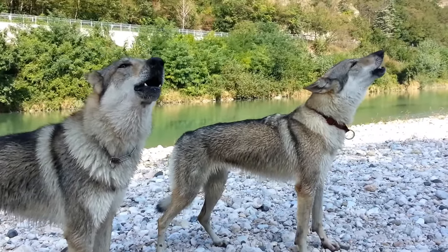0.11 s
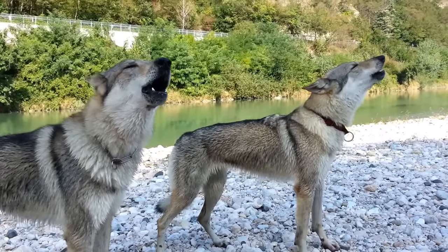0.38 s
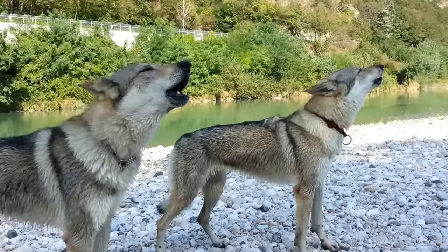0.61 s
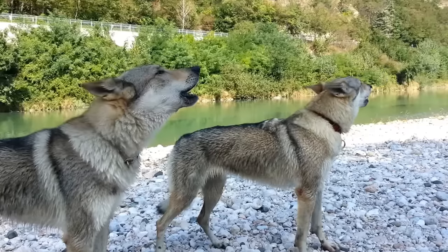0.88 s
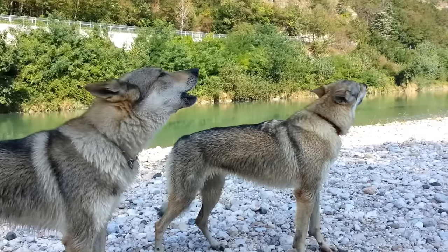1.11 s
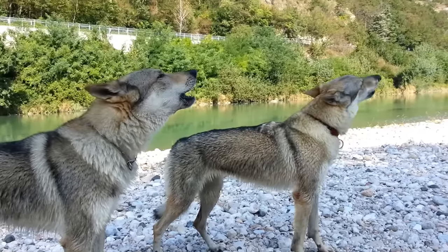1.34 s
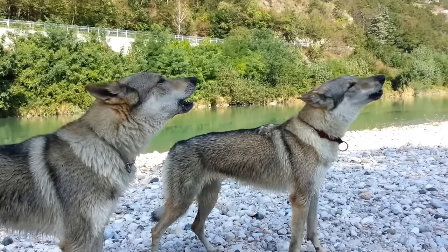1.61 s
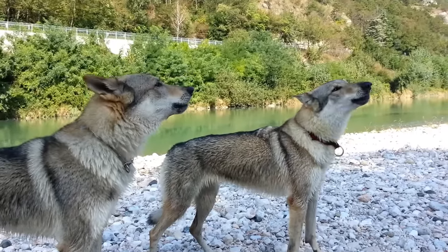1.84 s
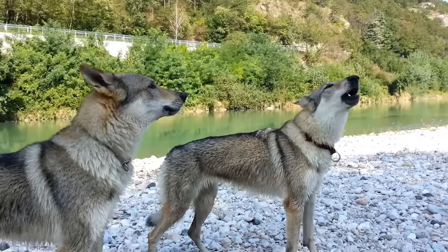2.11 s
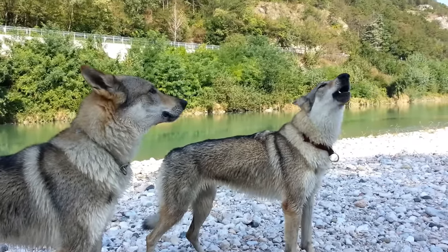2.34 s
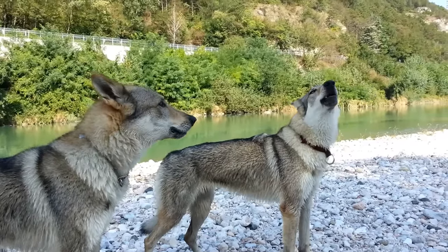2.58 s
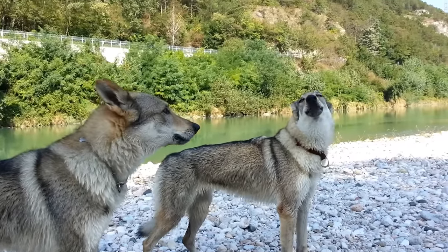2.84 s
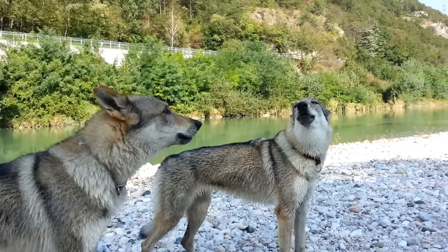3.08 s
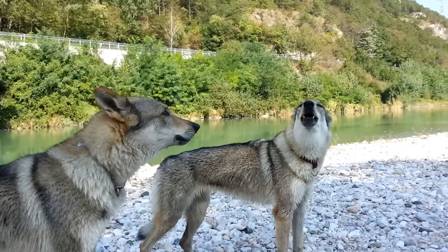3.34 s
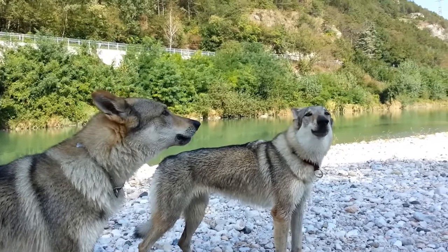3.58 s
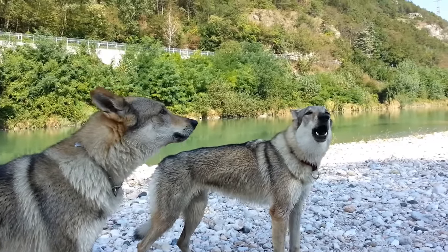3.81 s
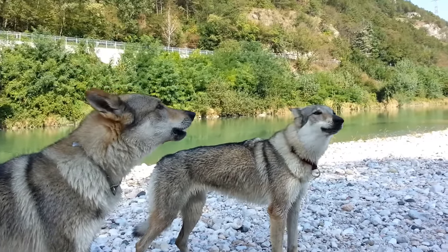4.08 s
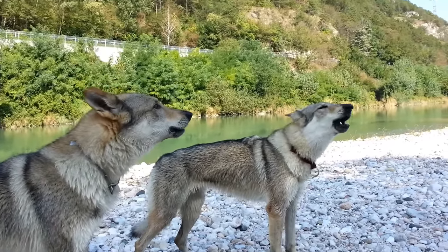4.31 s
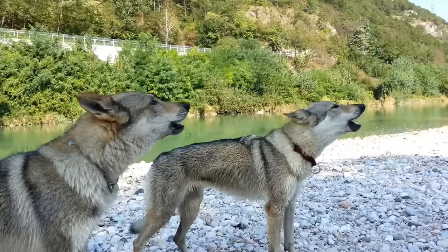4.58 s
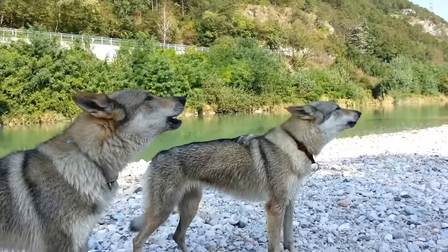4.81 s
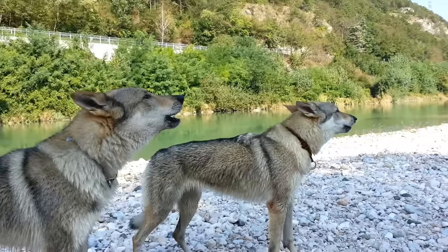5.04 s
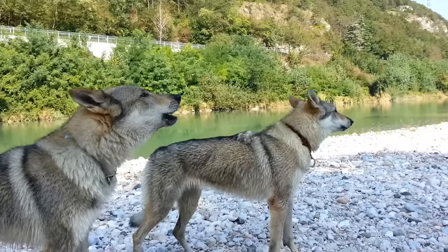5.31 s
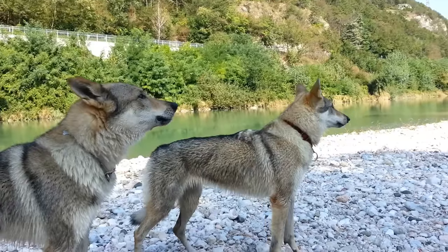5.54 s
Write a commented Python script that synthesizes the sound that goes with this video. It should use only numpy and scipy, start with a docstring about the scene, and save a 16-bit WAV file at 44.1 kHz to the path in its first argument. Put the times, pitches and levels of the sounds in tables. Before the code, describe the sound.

Close outdoor duet of howling dogs: a steady low howl against rough, swooping higher yelps, over a soft murmur of river water.

```python
"""Two dogs open together over a murmuring river: one on a long low note, the other on short sliding yelps.
The yelper growls and breaks to half pitch from the start, with higher yelps after three seconds;
a far third dog joins faintly, and the low dog comes back after three seconds and sounds until late.
Voices are sums of sine partials under throat and mouth resonances, with noise for breath and rasp;
shaped noise makes the river, smeared echoes the far slope, and the loudest yelps overload the recorder."""
import sys
import numpy as np
from scipy import signal
from scipy.fft import rfft, irfft, next_fast_len
from scipy.io import wavfile
from scipy.ndimage import uniform_filter1d

SR = 44100
rng = np.random.default_rng(int(sys.argv[2]) if len(sys.argv) > 2 else 0)


def generate_wav(sig):
    """Save sig (samples, or channels by samples) to the path in sys.argv[1] as 16-bit PCM at SR."""
    pcm = np.round(np.clip(np.atleast_2d(sig).T, -1, 1) * 32767).astype(np.int16)
    wavfile.write(sys.argv[1], SR, pcm)


def ratio(d):
    """dB to gain"""
    e = np.asarray(d, float) / 20
    return 10 ** e


N = 250035

# one list per stretch of the low howl: t/s, pitch f/Hz, chest tone level/dB, mouth opening/0-1,
# mouth ring level/dB
LOW_HOWL = [
    [(0.0, 406.2, -10, 0.33, -4), (.05, 400.6, -11.5, .32, -17.5), (.11, 425.4, -6.5, .18, -8),
     (.2, 416, -7, 0.34, -8.5), (.25, 422.4, -14.5, 0.3, -11.5), (.28, 515.5, -20, .3, -28),
     (.31, 528.5, -20.5, 0.5, -2), (.36, 551, -15.5, .4, -3), (.4, 557.4, -17, 0.43, -8),
     (.45, 519.4, -12, 0.49, -4), (.5, 544.4, -18, .4, -10.5), (.58, 585.3, -19.5, .39, 1),
     (.68, 555.3, -16.5, .36, -10), (.75, 569, -13.5, .39, -7), (.82, 548, -9.5, 0.46, -4),
     (.9, 522, -8, 0.51, -1), (.96, 497, -10.5, 0.59, -11.5), (1.01, 485.5, -7.5, 0.4, -3.5),
     (1.025, 428.3, -4, 0.3, 0.5), (1.05, 422.7, -5, 0.4, -4.5), (1.25, 418, -12, 0, -5.5),
     (1.38, 406.3, -10.5, .44, -11), (1.48, 415.3, -11, .47, -15.5), (1.6, 406.2, -11.5, 0.39, -12),
     (1.7, 388, -15.5, 0.23, -18.5), (1.762, 382.3, -14.5, 0, -8), (1.778, 363, -16.5, .1, -7),
     (1.82, 362, -17.5, 0, -6), (1.885, 341, -19.5, .1, -17.5), (1.94, 295.3, -35, 0.31, -24),
     (2.06, 285.4, -44, 0.1, -62)],
    [(3.12, 363, -54, 0.2, -44.5), (3.16, 339.6, -21, .55, -6), (3.2, 324.8, -32, .4, -15),
     (3.27, 343, -26, .55, -24), (3.3, 470, -28.5, 0.4, -23), (3.34, 416.4, -21, .2, -17.5),
     (3.38, 430, -17.5, 0.8, -18.5)],
    [(3.51, 479, -64, 0.6, -35), (3.58, 391.3, -20, .66, -25), (3.63, 357, -15.5, 0.8, -3),
     (3.76, 348, -20, .57, -27.5), (3.88, 315.4, -29, .48, -28), (3.94, 306, -45.5, .45, -29.5)],
    [(4.14, 363, -29.5, 0.2, -51), (4.172, 392.7, -22, 0, -11), (4.19, 402.9, -10, 0.3, -3),
     (4.21, 386.3, -11, .13, -2.5), (4.25, 409.6, -4.5, .2, -8), (4.28, 408.2, -9, .17, -4),
     (4.3, 522, -12, .45, -12), (4.33, 487, -15, 0.4, -11), (4.38, 484.6, -19.5, .28, -15),
     (4.48, 472, -41, 0, -27.5), (4.54, 380.3, -18, 0.4, -33.5), (4.57, 368, -17, .15, -15),
     (4.63, 425.4, -8, 0.33, -6.5), (4.66, 484.7, -10, .27, -5.5), (4.72, 540, -19, .33, -32),
     (4.77, 553.4, -17, .37, -11), (4.88, 536.7, -12.5, 0.5, -9.5), (5.05, 535.8, -10, 0.5, -7),
     (5.17, 532.4, -14.5, 0.52, -19.5), (5.25, 470, -13, 0.35, -5.5), (5.3, 421, -8.5, 0.32, -5.5),
     (5.43, 392, -8, 0.29, -8.5), (5.5, 377.4, -11, 0.37, -19.5), (5.55, 348, -16.5, 0.66, -24),
     (5.6, 312.5, -28, 0.13, -17), (5.67, 292, -41, 0, -29)],
]
# low dog's mouth: f/Hz, width/Hz, level at 500 Hz pitch/dB, slope/dB per octave of pitch
LOW_MOUTH = [(2190, 210, 7.5, -31), (2900, 560, 3, -5), (4437, 150, 23.5, 25.5), (5170, 2200, 5, 5.5),
             (6800, 510, -4.5, -9), (9000, 980, -3.5, 13.5), (13100, 580, -22, 21.5)]
# a head turned toward the microphone sounds brighter: t/s, upper partials' gain level/dB
LOW_FACING = [(0, 1), (.4, 4), (.55, -1.5), (.7, 5.5), (.85, 2), (1.0, 2.5), (1.2, -8), (1.7, -13),
              (1.8, -1.5), (3.6, 10.5), (4.25, 1), (4.9, -0.5), (5.3, -10), (5.67, 5.5)]
SLIDING_FACING = [(0, -2), (.6, 7), (1.2, -6), (1.75, -9.5), (2.2, 4.5), (2.4, 2.5), (2.6, 5), (2.9, 4.5),
                  (3.15, 12.5), (3.45, 7), (3.65, 7.5), (4.05, 7.5), (4.4, 3), (4.9, 2.5)]
# ring width/Hz, octave ring level/dB, chest tone's fall/dB per partial, upper partials' base level/dB,
# share of the ring's dB they follow, share of the chest tone's dB they follow
LOW_VOICE = (301.5, -22.5, -16, -38.5, 0.8, 0.78)
SLIDING_VOICE = (303.5, -31, -19, -37, 0.53, 0.76)
# thin extra tones and whistles heard among the dogs' voices: start t/s, end t/s, start f/Hz, end f/Hz,
# level before flutter/dB
SIDE_TONES = [(0.0, 0.107, 1120, 1238, -22), (.28, 0.358, 850, 794, -14.5), (0.297, 0.38, 971, 970, -17),
              (0.289, 0.343, 1454, 1271, -22), (0.957, 1.095, 2900, 2900, -35.5),
              (1.022, 1.148, 770, 756, -18.5), (1.03, 1.291, 1192, 1130, -22),
              (1.585, 1.704, 5200, 5170, -33.5), (3.501, 3.675, 2680, 2660, -40),
              (3.831, 3.914, 2834, 2954, -29.5)]
# yelping dog, one list per call or register: t/s, pitch f/Hz, chest tone level/dB, mouth opening/0-1,
# mouth ring level/dB
SLIDING_HOWL = [
    [(0.0, 686, -13.5, 0.34, -30.5), (.05, 738, -7.5, .62, -19.5), (.095, 753, -12, .66, -29),
     (.12, 787, -54, 0.54, -56.5)],
    [(.12, 459.6, -25, 0.3, -31), (.16, 522, -16.5, .3, -36), (.21, 516.8, -19.5, 0.34, -21.5),
     (.25, 563, -13, .38, -8.5), (.29, 612.4, -11, .44, -14.5), (.355, 624.6, -9, 0.41, -26),
     (.372, 722, -15.5, .6, -15), (.4, 680, -10, .55, -13), (.43, 618.5, -11, .47, -23.5),
     (.48, 614, -7, 0.62, -44), (.5, 635, -7, .48, -33), (.53, 735, -13.5, .62, -31.5),
     (.55, 777.5, -9.5, .68, -14.5), (.59, 797.5, -14.5, .7, -17), (.65, 754, -19, 0.76, -14.5),
     (.7, 651, -7, 0.16, -14), (.74, 592, -14.5, 0.48, -40), (.77, 580, -27, 0.5, -53)],
    [(1.09, 564, -48, 0.32, -58.5), (1.11, 549, -7, .4, -40.5), (1.135, 628, -12, .55, -18.5),
     (1.15, 772, -12, .66, -19), (1.19, 720, -7.5, .6, -22), (1.23, 733.5, -9, .62, -16.5),
     (1.295, 669.6, -8.5, .53, -29.5), (1.34, 756.3, -8, .65, -24), (1.4, 725, -4.5, .61, -19),
     (1.5, 645, -8, .49, -39), (1.6, 607.2, -6, .44, -26), (1.65, 622, -5, 0.35, -43),
     (1.74, 575.7, -5.5, .37, -37), (1.77, 505, -11, .32, -38)],
    [(2.164, 522.7, -31, 0.65, -39), (2.176, 496.6, -10.5, .66, -12.5), (2.19, 569, -12, 1, -22),
     (2.2, 573.2, -9.5, 0.51, -39), (2.255, 639, -3, .47, -33)],
    [(2.245, 487, -10.5, 0.13, 1), (2.27, 553.2, -7.5, 0.2, -7.5), (2.3, 575.7, -9, 0.21, -31.5),
     (2.33, 551.5, -10.5, .34, -7.5), (2.36, 536.3, -7.5, .34, -19), (2.46, 523.4, -10, .32, -4),
     (2.49, 528, -8.5, .33, -9)],
    [(2.48, 620, -7, .48, -27.5), (2.5, 674, -11, 0.25, -9), (2.55, 670.3, -13.5, .53, -17.5),
     (2.6, 629.8, -3.5, .47, -27.5), (2.65, 513.7, -7.5, 0.41, -25.5), (2.7, 534.5, -6.5, .33, -34),
     (2.73, 527, -11, .32, -3), (2.8, 603.3, -6.5, 0.46, -13), (2.83, 595.3, -10, 0.51, -17),
     (2.885, 515, -10, 0.44, -14.5), (2.99, 550, -15, .36, -33.5)],
    [(2.98, 547.5, -18.5, .36, -36), (3.02, 627.7, -14, 0.56, -31.5), (3.051, 761.8, -8, .66, -8.5),
     (3.058, 776, 1, 0.78, 1.5), (3.09, 801, -6, 0.78, 5), (3.11, 817, -40.5, 0.88, -39.5),
     (3.13, 807.4, -13, 0.82, -6), (3.165, 660.5, -12.5, .55, -10), (3.18, 523, -9, .6, -22),
     (3.2, 483, -13.5, 0.59, -29.5), (3.28, 560.5, -16.5, 0.99, -51)],
    [(3.27, 546, -19, .45, -33.5), (3.31, 637.3, -9.5, .47, -31), (3.342, 774, -11.5, 0.22, 0),
     (3.35, 783.6, 2.5, 1, 7), (3.38, 785, -13.5, .7, -3.5), (3.41, 787, -3, .7, -8.5),
     (3.45, 734, -19.5, .62, -11), (3.49, 678, -6.5, .52, -6.5), (3.52, 623, -6, 0.15, -16.5),
     (3.535, 583, -27, 0.47, -25.5)],
    [(3.52, 538, -15.5, 0.5, -30.5), (3.55, 546, -9.5, 0.51, -15.5), (3.63, 572, -15.5, .6, -30.5),
     (3.66, 502, -65, 0.48, -55)],
    [(3.935, 554, -28, 0.98, -33.5), (3.95, 532, -6, 0.43, 7), (3.965, 622, -10.5, 0.67, -1),
     (3.98, 850, -4, .79, 5), (3.995, 918, 3, 0.3, -17), (4.01, 888, -3, .83, -0.5),
     (4.05, 699, -16, 0.67, -5), (4.065, 532, -3, 0.68, -22), (4.1, 465, -15.5, 0.46, -17.5),
     (4.16, 425, -21.5, .52, -27)],
    [(4.31, 567.6, -26.5, .37, -46), (4.36, 638.5, -20.5, 0.6, -39.5), (4.38, 857, -10.5, .8, -8.5),
     (4.395, 974.4, 4, 1, -8.5), (4.41, 984, -0.5, 1, 2), (4.43, 957.5, 0, .93, -19),
     (4.45, 859, -1.5, .8, -7.5), (4.48, 733, -17.5, .66, -4.5), (4.505, 515.4, -6.5, 0.58, -6),
     (4.52, 533, -9.5, 0.64, -16.5), (4.61, 578, -12, 0.7, -31)],
    [(4.6, 582, -16.5, 0.44, -34.5), (4.62, 592, -14, 0.61, -38.5), (4.64, 725, -14.5, 0.54, -28),
     (4.66, 814.6, -13, .76, -7.5), (4.69, 914.5, -4, .88, -0.5), (4.73, 845.4, -8.5, .77, -3.5),
     (4.75, 749, -16.5, 0.77, -12), (4.78, 715, -6.5, 0.36, -11.5), (4.8, 510.5, -14.5, .62, -14),
     (4.84, 519, -11.5, .35, -39.5), (4.92, 492, -38, 0.29, -45.5)],
]
# yelping dog's mouth resonances: f/Hz, width/Hz, level/dB
SLIDING_MOUTH = [(2340, 350, 4), (2987, 450, 6.5), (4330, 690, 2.5), (5450, 1500, -2), (6400, 1900, -8)]
# strong-weak fold cycles, heard as lines at half pitch: start t/s, end t/s, level/dB
HALVES = [(0.0, 0.121, -30.5), (1.611, 1.682, -26), (2.478, 2.573, -10), (3.049, 3.08, -0.5),
          (3.087, 3.159, -6.5), (3.341, 3.469, -7.5), (4.025, 4.06, -15), (4.463, 4.49, -17.5)]
# throat resonances over the half-pitch lines: f/Hz, width/Hz, level/dB
HALF_THROAT = [(1040, 260, 5), (1850, 170, -10), (2900, 390, -27.5), (5500, 1900, -22.5),
               (9000, 3000, -47.5)]
# folds losing their regular beat: start t/s, end t/s, third-pitch lines' level/dB, rasp level/dB
GROWLS = [(0.0, 0.137, -25.5, -27.5), (0.252, 0.371, -23, -25), (1.114, 1.148, -44, -22.5),
          (1.766, 1.798, -54, -34), (2.17, 2.256, -10, -15.5), (2.248, 2.342, -22, -24),
          (2.443, 2.493, -54.5, -22), (2.744, 2.873, -16, -18), (3.035, 3.162, -59.5, -36.5),
          (3.072, 3.126, -18.5, -5.5), (3.17, 3.17, -39, -38.5), (3.358, 3.385, -20, -6.5),
          (3.936, 3.989, -33.5, -16), (3.365, 3.462, -51, -53.5), (4.469, 4.531, -44, -20.5),
          (4.769, 4.803, -51, -37.5)]
# throat resonances over growl, rasp and breath: f/Hz, width/Hz, level/dB
GROWL_THROAT = [(470, 109, 3), (903, 242, 3.5), (1290, 480, -2.5), (2230, 800, -17.5), (5950, 830, -19),
                (9850, 4000, -40)]
# far dog, one list per call: t/s, pitch f/Hz, level/dB
FAR_HOWL = [
    [(.3, 392, -42), (1.0, 377, -41)],
    [(1.8, 413.5, -25), (1.9, 409.4, -31), (2.0, 419.8, -29.5), (2.35, 394.7, -34), (2.7, 402.7, -33),
     (3.5, 398.4, -37.5), (3.9, 379.4, -32), (4.4, 384.6, -37), (4.92, 378.7, -35.5), (5.0, 377, -43.5)],
    [(5.5, 634, -38), (5.55, 589, -20), (5.67, 458, -35.5)],
]
# far dog's throat resonances: f/Hz, width/Hz, level/dB
FAR_THROAT = [(430, 550, 3), (850, 400, -31.5), (2504, 74, -5.5)]
# returns from the far slope: delay t/s, level/dB
ECHOES = [(.05, -20), (.14, -30), (.35, -35)]
# colour of the water: f/Hz, relative density level/dB per Hz
RIVER = [(20, -47), (100, -38.5), (280, -22), (500, -5.5), (800, -6), (1700, -15), (3000, -26.5),
         (5000, -24.5), (7500, -36.5), (14000, -51)]
# the murmur swells and sinks: t/s, gain level/dB
RIVER_SWELL = [(0, 3), (1.5, -1), (2.1, 0.5), (3.8, 0.5), (5.0, 0.5), (5.67, -4)]


def low_dog():
    """Clean howl: four strong partials and a faint, uneven bright top from the mouth resonances."""
    out, waver = np.zeros(N), 0.0023 * drift(62)
    brightness = over_time(LOW_FACING) * flickers(depth_db=5.5, rate_hz=6.3)
    for rows in LOW_HOWL:
        at, hz, strong, top = partials(rows, LOW_VOICE, count=4)
        phase = cycles(hz, waver[at])
        out[at] += strong_tone(phase, strong)
        mouth = [(mid, width, db + slope * np.log2(hz / 500)) for mid, width, db, slope in LOW_MOUTH]
        out[at] += top * upper(phase, hz, first=5, mouth=mouth, patches=brightness[:, at])
    return out


def sliding_dog():
    """Yelping howl; strong-weak cycles add lines at halves and thirds, irregular ones rasp."""
    out, waver = np.zeros(N), .002 * drift(35)
    thirds, rasp = growl_levels()
    halves, uneven = half_levels(), flickers(depth_db=8.5, rate_hz=2.7)
    facing = over_time(SLIDING_FACING)
    turbulence = coloured(lambda hz: resonances(GROWL_THROAT, hz), channels=1)[0]
    hoarse = coloured(lambda hz: resonances(SLIDING_MOUTH, hz), channels=1)[0]
    shaken = waver + 0.025 * rasp * drift(110)   # the pitch shakes while it rasps
    for rows in SLIDING_HOWL:
        # the chest tone thins out as it slides through one pitch: f/Hz, width/Hz, level/dB
        at, hz, strong, top = partials(rows, SLIDING_VOICE, count=3, thin_spot=(720.5, 38, -5))
        top = top * facing[at]
        phase = cycles(hz, shaken[at])
        out[at] += strong_tone(phase, strong)
        out[at] += top * upper(phase, hz, first=4, mouth=SLIDING_MOUTH, patches=uneven[:, at])
        out[at] += top * ratio(8) * hoarse[at]   # hiss in the open mouth
        for k in range(1, 30, 2):
            out[at] += halves[at] * resonances(HALF_THROAT, k * hz / 2) * np.sin(k * phase / 2 + k * k)
        for k in range(2, 44):
            if k % 3:
                out[at] += thirds[at] * resonances(GROWL_THROAT, k * hz / 3) * np.sin(k * phase / 3 + k * k)
    # the rasp comes in uneven puffs, some two hundred a second
    puffing = 1 + .9 * np.cos(cycles(np.full(N, 195.), .25 * drift(40)))
    torn = puffing * ratio(2.5 * drift(50))
    highpass = signal.butter(6, 340, "high", fs=SR, output="sos")
    puffs = signal.sosfilt(highpass, rasp * turbulence * torn)
    return breathy(out, breath_db=-45.5) + puffs


def half_levels():
    """Gain of the half-pitch lines: each passage rises, holds and falls."""
    t = np.arange(N) / SR
    rise_s, fall_s = .012, 0.041
    total = 0
    for start, end, db in HALVES:
        shape = np.minimum((t - start) / rise_s, (end - t) / fall_s + .5)
        total = total + ratio(db) * np.clip(shape, 0, 1) ** 2
    return total


def growl_levels():
    """Gains of the third-pitch lines and of the rasp; each growl bursts in and ebbs away."""
    t, thirds, rasp = np.arange(N) / SR, 0, 0
    for start, end, thirds_db, rasp_db in GROWLS:
        burst = np.clip((t - start + (start == 0)) / .014, 0, 1)   # one at time zero is already full
        ebb = np.clip((end + 0.0087 - t) / (0.31 * (end - start)), 0, 1)
        thirds = thirds + burst * ebb * ratio(thirds_db)
        rasp = rasp + burst * ebb * ratio(rasp_db)
    return thirds, rasp


def breathy(voice, breath_db):
    """Air rushing past the folds follows the strength of the voice."""
    strength = np.sqrt(uniform_filter1d(voice ** 2, size=700) + 1e-12)
    air = coloured(lambda hz: resonances(GROWL_THROAT, hz), channels=1)[0]
    return voice + ratio(breath_db) * strength * air


def side_tones():
    """Each is a near sine that swells, glides and flutters; those starting above 2.8 kHz arch."""
    out, waver, flutter = np.zeros(N), .002 * drift(25), ratio(2 * drift(25))
    for start, end, start_hz, end_hz, db in SIDE_TONES:
        at = slice(int(start * SR), int(end * SR))
        along = np.linspace(0, 1, at.stop - at.start)
        swell = np.sqrt(np.sin(np.pi * along) + 1e-9)
        glide_hz = start_hz + (end_hz - start_hz) * along
        arch = 0.033 * (swell - .8) * (start_hz > 2800)
        out[at] += ratio(db) * swell * np.sin(cycles(glide_hz, waver[at] + arch))
    return out * flutter


def far_dog():
    """A thin howl of seven partials through the throat, its pitch and level wandering."""
    out, waver = np.zeros(N), 0.0029 * drift(2.6)
    for rows in FAR_HOWL:
        at, hz, (gain,) = amp_curves(rows)
        phase = cycles(hz, waver[at])
        out[at] += gain * sum(resonances(FAR_THROAT, k * hz) * np.sin(k * phase) for k in range(1, 8))
    return out * ratio(1.5 * drift(10))


def slope_echoes(x):
    """Dull returns from bushes and hillside, each smeared over many leaves, different per side."""
    t, reply = np.arange(int(.6 * SR)) / SR, 0
    for delay, db in ECHOES:
        smear = np.exp(-.5 * ((t - delay) / (0.052 * delay)) ** 2)
        reply = reply + ratio(db) * smear / np.sqrt(0.26 * delay * SR)
    dull = signal.lfilter(*signal.butter(1, 2000, fs=SR), x)
    leaves = reply * rng.standard_normal((2, len(t)))
    return signal.fftconvolve(dull[None], leaves, axes=1)[:, :N]


def river():
    """Smooth distant water: shaped noise, partly alike at both ports."""
    hz_points, db_points = np.transpose(RIVER)

    def colour(hz):
        return ratio(np.interp(np.log(hz), np.log(hz_points), db_points))

    left, right, both = coloured(colour, channels=3)
    return ratio(-41) * over_time(RIVER_SWELL) * (1.42 * both + 0.39 * np.array([left, right]))


def partials(rows, voice, count, thin_spot=None):
    """Sample range, pitch, and gains of strong and upper partials; the ring rises as the mouth opens."""
    width_hz, octave_db, fall_db, top_db, of_ring, of_chest = voice
    s, pitch_hz, chest_db, opening, ring_db = np.transpose(rows)
    upper_db = top_db + of_ring * ring_db + of_chest * chest_db
    at, hz, (chest, ring, top) = amp_curves(np.transpose([s, pitch_hz, chest_db, ring_db, upper_db]))
    opening = np.interp(np.arange(at.start, at.stop) / SR, s, np.clip(opening, 0, 1))
    shut_hz, wide_hz = 600, 2000
    mouth_hz = shut_hz + (wide_hz - shut_hz) * opening
    if thin_spot:
        mid_hz, thin_hz, thin_db = thin_spot
        chest = chest * ratio(thin_db / (1 + (2 * (hz - mid_hz) / thin_hz) ** 2))
    octave_db = octave_db - 13.5 * (opening - .4)   # the octave ring fades as the mouth opens
    mouth = [(mouth_hz, width_hz, 0), (2 * mouth_hz, 2 * width_hz, octave_db)]
    strong = [chest]
    for k in range(1, count):
        strong.append(np.hypot(chest * ratio(fall_db * k), ring * resonances(mouth, (k + 1) * hz)))
    return at, hz, strong, top


def strong_tone(phase, gains):
    """Sum of the lowest partials, their starting phases scattered."""
    return sum(g * np.sin(k * phase + k * k) for k, g in enumerate(gains, start=1))


def upper(phase, hz, first, mouth, patches):
    """Partials from the given multiple up, weighted by the mouth; they share the flickers in turn."""
    total = 0
    for k in range(first, 36):
        if k * hz.min() < 15000:
            gain = patches[k % len(patches)] * resonances(mouth, k * hz) * (k * hz < 16000)
            total = total + gain * np.sin(k * phase + 0.14 * k * k)
    return total


def cycles(hz, waver):
    """Running phase of a tone such as the vocal folds', with a relative unsteadiness in pitch."""
    return 2 * np.pi * np.cumsum(hz * (1 + waver)) / SR


def resonances(modes, hz):
    """Gain of a set of resonances at the given frequencies, summed in power."""
    return np.sqrt(sum(ratio(db) ** 2 / (1 + (2 * (hz - mid_hz) / width_hz) ** 2) ** 2
                       for mid_hz, width_hz, db in modes))


def amp_curves(rows):
    """Sample range, rounded pitch and gains of one table, with short fades where it starts or stops."""
    s, hz, *levels_db = np.transpose(rows)
    a, b = int(s[0] * SR), min(int(s[-1] * SR), N)
    t = np.arange(a, b) / SR
    # a call already sounding at the start, or cut by the end, is not faded there
    edge_s = np.minimum(t - s[0] + (a == 0), s[-1] - t + (b >= N - 1))
    fade = np.clip(edge_s / .006, 0, 1)
    pitch_hz = uniform_filter1d(np.interp(t, s, hz), size=400, mode="nearest")
    return slice(a, b), pitch_hz, [fade * ratio(np.interp(t, s, c)) for c in levels_db]


def drift(rate_hz):
    """Smooth random wander of spread 1: noise through a double one-pole lowpass."""
    r = np.exp(-2 * np.pi * rate_hz / SR)
    slow = signal.lfilter([1], [1, -2 * r, r * r], rng.standard_normal(N + SR))[SR:]
    return slow / slow.std()


def flickers(depth_db, rate_hz):
    """Five unrelated wandering gains."""
    return ratio(depth_db * np.array([drift(rate_hz) for _ in range(5)]))


def over_time(points):
    """Gain at every sample from t/s, level/dB points."""
    return ratio(np.interp(np.arange(N) / SR, *np.transpose(points)))


def coloured(gain_at, channels):
    """White noise shaped by a gain function of frequency; rms 1 over all channels."""
    size = next_fast_len(N)
    hz = np.maximum(np.arange(size // 2 + 1) * SR / size, 1)
    noise = irfft(rfft(rng.standard_normal((channels, size))) * gain_at(hz), size)[:, :N]
    return noise / noise.std()


def placed(x, left_lag_s, left_db, left_shadow_db):
    """Two close microphone ports: a small lag, and the left port shadowed around 1.3 kHz."""
    size = next_fast_len(N + 64)
    hz = np.arange(size // 2 + 1) * SR / size
    tilt_db = left_db + left_shadow_db / (1 + ((hz - 1300) / 600) ** 2)
    # half of the lag and tilt goes to the left, the opposite half to the right
    half = ratio(tilt_db / 2) * np.exp(-1j * np.pi * hz * left_lag_s)
    return irfft(rfft(x, size) * np.array([half, 1 / half]), size)[:, :N]


def scene():
    """Low dog with the side tones, yelping dog and far dog at their places, echoes and river."""
    low, sliding, far = low_dog() + side_tones(), sliding_dog(), far_dog()
    voices = placed(low, left_lag_s=.00007, left_db=0.18, left_shadow_db=-0.18)
    voices = voices + placed(sliding, left_lag_s=-0.0001, left_db=0.11, left_shadow_db=-5.5)
    voices = voices + placed(far, left_lag_s=-0.00025, left_db=.3, left_shadow_db=-1.5)
    return voices + slope_echoes(low + sliding) + river()


def gain_control(x):
    """Catches rises in level, lets go at a steady rate, and turns up what is quiet."""
    aim_db, make_up, most_db = -6.5, 0.17, 9   # make_up: share of the gap that is made up
    recover_db_per_s, react_s = 32.5, 0.012
    level_db = 10 * np.log10(uniform_filter1d((x ** 2).mean(axis=0), size=900) + 1e-12)
    ramp = recover_db_per_s * np.arange(N) / SR
    held_db = np.maximum.accumulate(level_db + ramp) - ramp
    want_db = np.clip(make_up * (aim_db - held_db), -most_db, most_db)
    r = np.exp(-1 / (react_s * SR))
    return x * ratio(signal.lfilter([1 - r], [1, -r], want_db))


def band_limit(x):
    """A steep low-pass at the top of the band."""
    return signal.sosfilt(signal.butter(12, 15000, fs=SR, output="sos"), x)


def record(dry):
    """Gain control, then peaks are clipped flat at full scale."""
    mix = np.clip(gain_control(dry), -1, 1)
    return band_limit(mix)


dry = scene()
out = record(dry)
generate_wav(out)
```